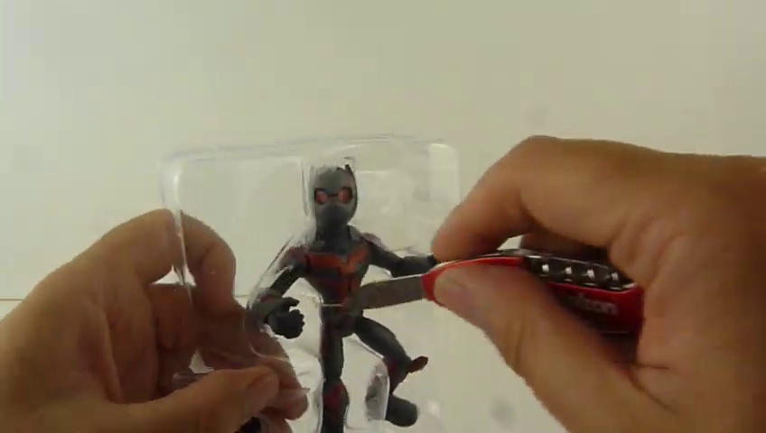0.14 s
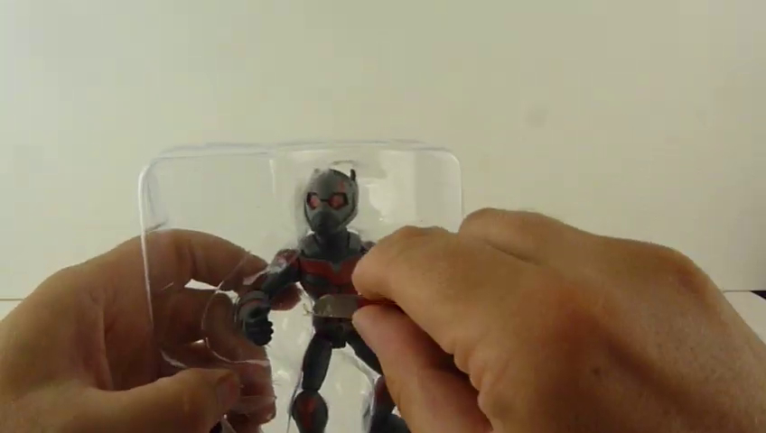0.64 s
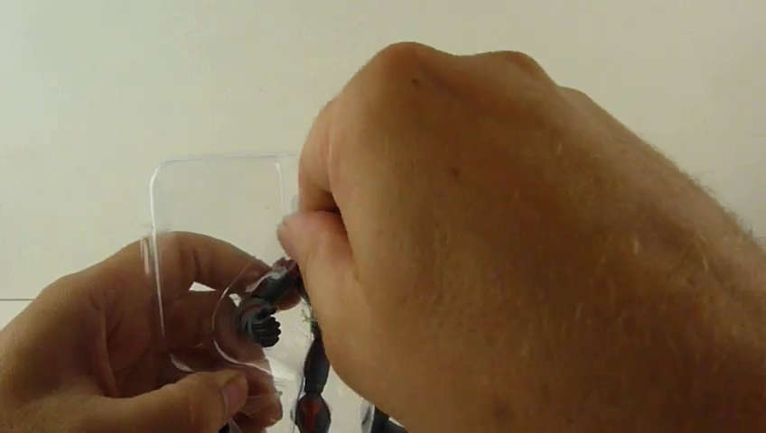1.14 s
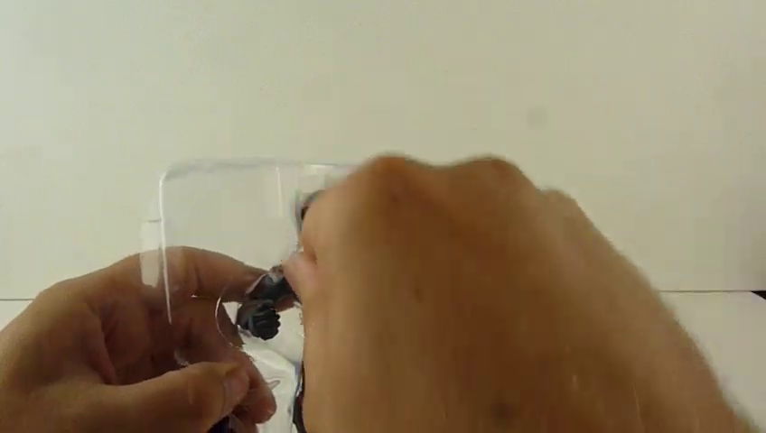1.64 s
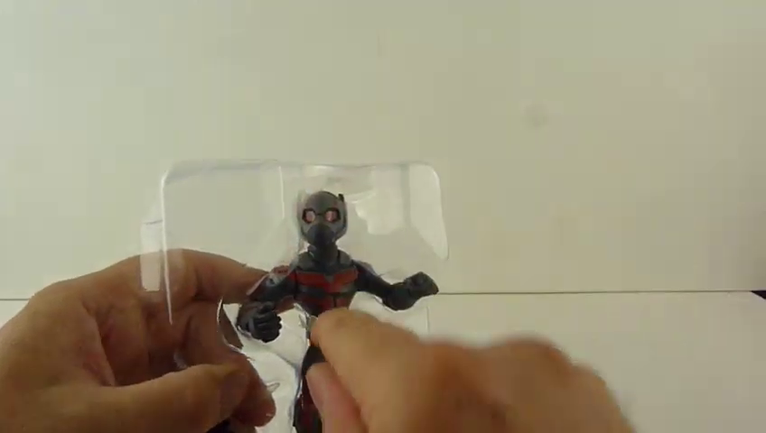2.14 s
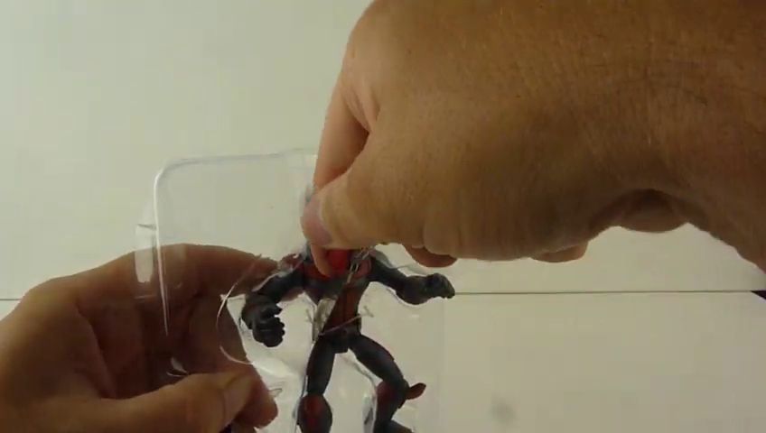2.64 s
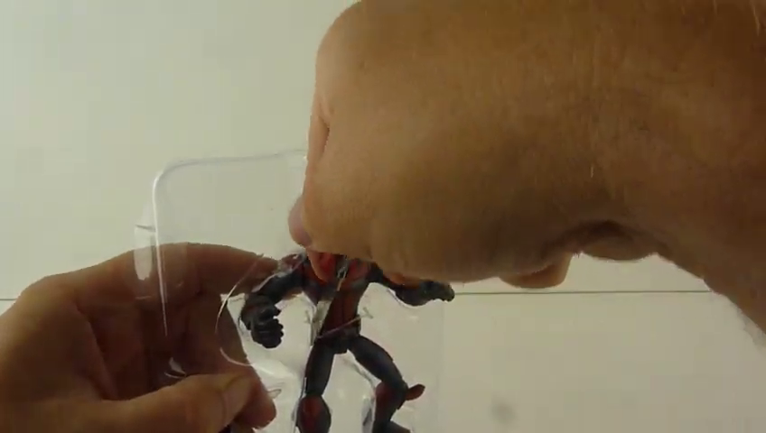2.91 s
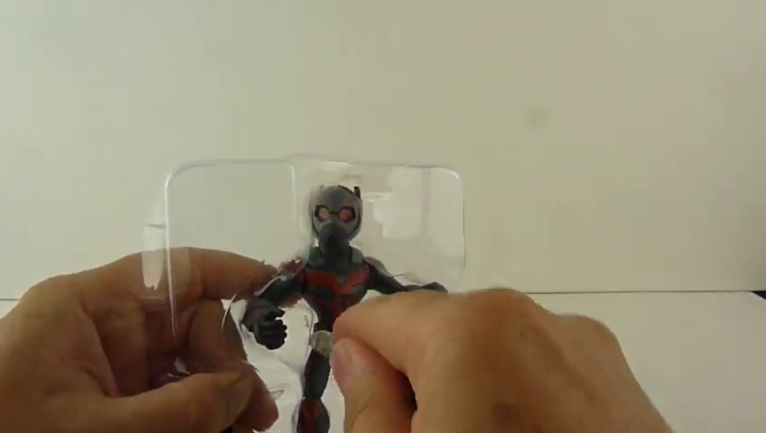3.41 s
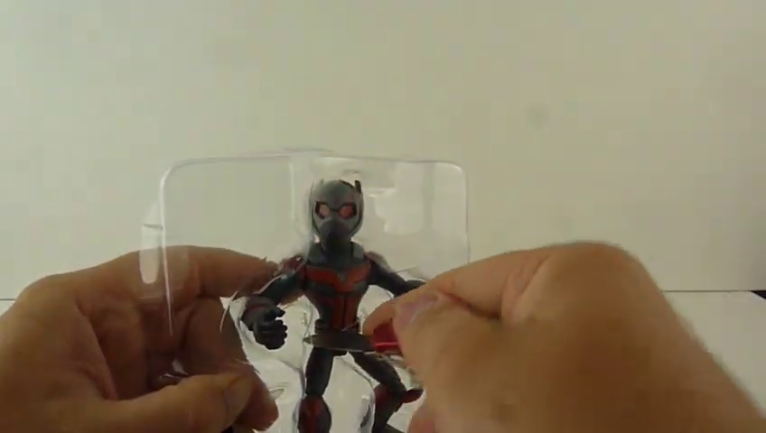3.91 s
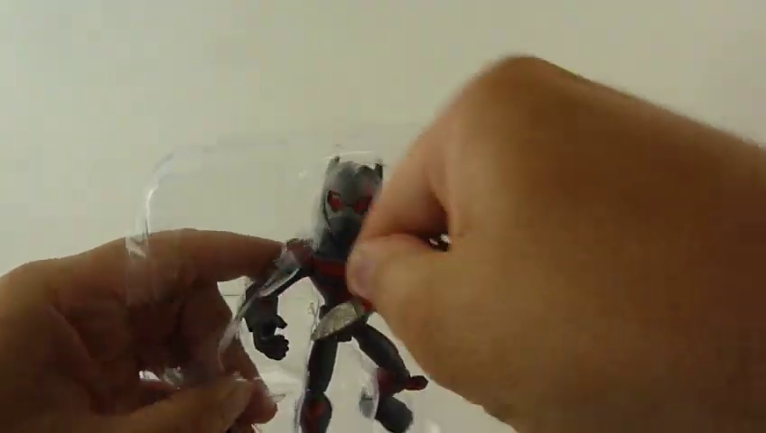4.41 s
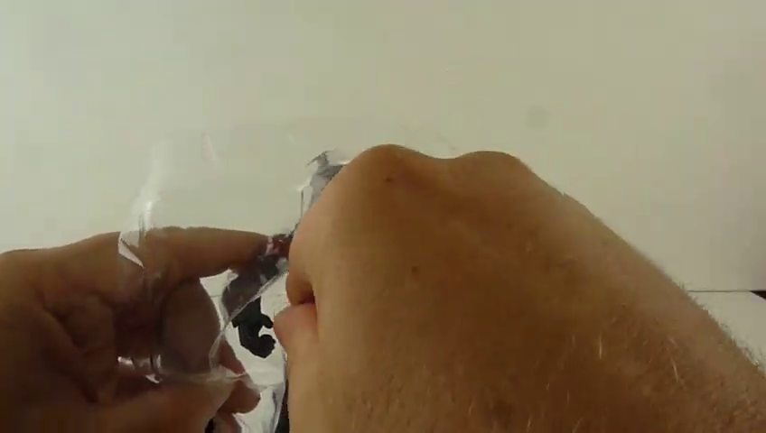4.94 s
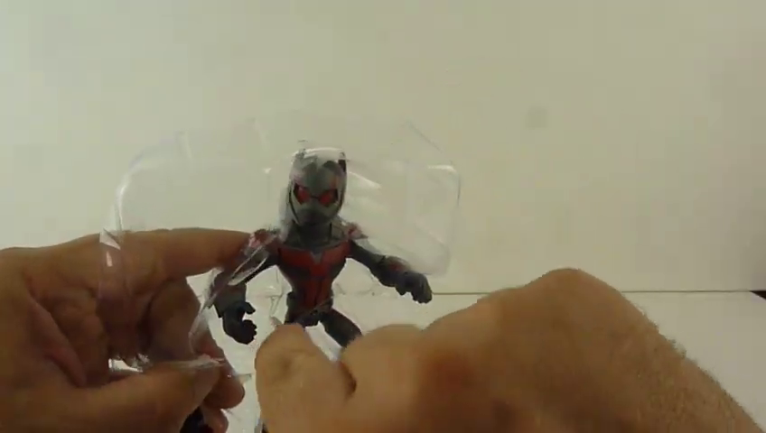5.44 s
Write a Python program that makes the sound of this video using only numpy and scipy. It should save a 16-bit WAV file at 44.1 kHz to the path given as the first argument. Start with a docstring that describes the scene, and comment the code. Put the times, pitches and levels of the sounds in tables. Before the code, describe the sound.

Hands flex stiff thin packaging while a blade knocks and briefly scrapes it. Dry clicks of varied pitch arrive in irregular clusters with fine crackle between, plus stronger snaps at about 2.5, 3.5, 4.25, 5.25 and 5.5 seconds. A close microphone with rolled-off highs catches a short small-room echo, faint rubbing hiss and very low background noise.

```python
"""In a quiet room, a thin moulded plastic tray is bent in one hand while a small knife picks at its ties, up close.
Each buckle or knife contact is a jolt with uneven after-slips, ringing the buckling spot and the tray's modes.
Small creases made the same way crackle at chance moments; the blade rasps as resonant friction noise.
Behind them lie the hiss of skin on plastic, a passing low hum (a gliding sine) and room air (coloured noise)."""
import sys
import numpy as np
from scipy import signal
from scipy.fft import rfft, irfft, next_fast_len
from scipy.io import wavfile
from scipy.ndimage import map_coordinates

SR = 44100
rng = np.random.default_rng(int(sys.argv[2]) if len(sys.argv) > 2 else 0)


def gain_from_db(level_db):
    """Convert decibel levels to linear amplitude factors (20 dB per decade)."""
    decades = np.asarray(level_db, float) / 20
    return 10 ** decades


def wrap_up_sound(samples):
    """Save the sound to the file named by the first command line argument, as 16-bit audio."""
    columns = np.atleast_2d(samples).T
    # keep every value between -1 and 1, then stretch to whole-number steps
    tamed = np.clip(columns, -1, 1)
    steps = np.round(tamed * 32767).astype(np.int16)
    wavfile.write(sys.argv[1], SR, steps)


N = 245122  # length in samples


def unit(x):
    """Scale to rms 1 along the last axis."""
    return x / np.sqrt(np.mean(x ** 2, axis=-1, keepdims=True) + 1e-20)


def along(points, hz):
    """Read (f/Hz, value) points on a log frequency axis."""
    f, value = np.transpose(points)
    return np.interp(np.log(hz + 1), np.log(f + 1), value)


def curves(rows):
    """One value per sample for each column after the time."""
    s, *columns = np.transpose(rows)
    return [np.interp(np.arange(N) / SR, s, column) for column in columns]


def filtered(x, response):
    """Multiply the spectrum of x by a function of frequency."""
    n = x.shape[-1]
    padded = next_fast_len(n + 8192)
    return irfft(rfft(x, padded) * response(np.fft.rfftfreq(padded, 1 / SR)), padded)[..., :n]


def hiss(spectrum):
    """Noise of rms 1 with the given colour."""
    return unit(filtered(rng.standard_normal(N), lambda hz: gain_from_db(along(spectrum, hz))))


def wobble(rate):
    """A smooth random curve, rate knots a second."""
    knots = rng.standard_normal(int(N * rate / SR) + 4)
    return map_coordinates(knots, [np.arange(N) * rate / SR])


def resonance(hz, centre, width):
    """Response of one damped mode, 1 at its centre; all in Hz."""
    return 1j * hz * width / (centre ** 2 - hz ** 2 + 1j * hz * width)


def laid(times, sounds, count=6):
    """Place the sounds in time, dealt out over several spots in the room."""
    spots = np.zeros((count, N + sounds.shape[1]))
    for k, (s, sound) in enumerate(zip(times, sounds)):
        spots[k % count, round(s * SR):][:len(sound)] += sound
    return spots[:, :N]


# buckles and knife contacts: (t/s, level/dB rms over the first 6 ms, favoured pitch f/Hz,
# fall below the pitch/dB per octave, fall above it/dB per octave)
BUCKLES = [(0.0226, -50, 2190, 0.5, 10), (0.0925, -48.5, 1510, 6, 12), (0.0991, -34.5, 3300, 2.5, 4.5),
           (0.133, -44, 500, 1.5, 8), (0.141, -33.5, 1750, 0, 6), (0.2166, -36.5, 2070, 11.5, 6.5),
           (0.2389, -40, 1280, 3.5, 7), (0.3118, -52.5, 2250, 3, 10.5), (0.5343, -36.5, 4150, -1.5, 14),
           (0.5555, -36.5, 1150, 1, 2), (0.6079, -37.5, 880, -1, 8), (0.6502, -53, 2290, 7, 16),
           (0.817, -53.5, 5900, 6, 8), (0.8494, -35.5, 2160, 5.5, 13), (0.8851, -34.5, 2190, 1.5, 11.5),
           (0.9041, -41, 1710, 11, 7.5), (1.04, -28.5, 478, 0, 9), (1.039, -25, 1500, 9, 8.5),
           (1.1052, -46, 1310, 4.5, 13.0), (1.1923, -50, 1010, 7, 10), (1.2439, -29.5, 2000, 0.5, 10.5),
           (1.3225, -47.5, 5870, 1, -2), (1.335, -37, 1730, -0.5, 5.5), (1.3812, -38, 1700, -0.5, 10),
           (1.4017, -42, 720, -4.5, 5), (1.4133, -41.5, 3300.0, -2, 1), (1.4244, -39, 1940, -3, 2.5),
           (1.4468, -43.5, 1920, 3, 0.5), (1.4496, -40, 537, 1, 11), (1.4943, -47, 880.0, -3, 6),
           (1.5226, -46.5, 860, -7.5, 10.0), (1.5544, -46.5, 870, -5.5, 10), (1.5668, -55, 740.0, 0, 8),
           (1.6006, -41, 2270, 1, 9.5), (1.6123, -42.5, 1250, 9, 11), (1.6227, -40.5, 1160, 5.5, 11),
           (1.641, -41, 630, 8, 16), (1.6723, -54, 876, -10, 21), (1.7792, -46.5, 850, -3, 8),
           (1.8588, -46.5, 1110, -8, 19), (1.8924, -47, 2930.0, 5.5, 16), (1.9077, -38, 1090, -3, 9.5),
           (1.988, -49, 2970, 1, 13), (2.0957, -52.5, 990, 12, 11), (2.1059, -34.5, 1640, -1.5, 8.5),
           (2.1062, -43.5, 432, 8.5, 18), (2.186, -48.5, 1680, 5, 26), (2.2003, -46.5, 1940, 4, 3),
           (2.2124, -38, 1750, 0.5, 5.5), (2.2728, -40, 1080, -4, 9), (2.2995, -36, 680, 0.5, 11),
           (2.3184, -32.5, 1790, 15, 11.5), (2.3295, -42, 1940, -5.5, 15), (2.4125, -29, 1810, 1, 14.5),
           (2.5136, -34.5, 1180, -4, 3), (2.521, -39.5, 1800, 2, 9.5), (2.5563, -18, 6300, 17, -2),
           (2.5544, -15, 2990, 10, 3), (2.5848, -41.5, 890, -0.5, 4), (2.6858, -32.5, 1700, 4, 7.5),
           (2.8253, -35.5, 1900, 4, 12), (2.8649, -39.5, 5630, 4, 4), (2.9003, -51, 537, 20, 21),
           (2.9281, -51, 1040, -7, 14), (2.9796, -42.5, 3100, 15, 18.5), (3.086, -46, 590, 0, 22),
           (3.171, -36.5, 615, 10, 12), (3.2081, -38, 1160, 10, 8), (3.275, -37.5, 1440, -5, 16),
           (3.3342, -30, 1120, 3, 5), (3.38, -38.5, 1140, -4.5, 10), (3.4342, -52, 1050.0, 18, 9),
           (3.4541, -43, 1190.0, -1, 11), (3.499, -39.5, 2150, -4.5, 6), (3.5104, -21, 950, 6, 6.5),
           (3.553, -39.5, 1830, -3.5, 10.0), (3.581, -39, 2150, -4, 9), (3.636, -43, 1180, 0, 12),
           (3.675, -40.5, 900, 1, 15.5), (3.7369, -45, 1110, -5, 15), (3.759, -42, 1590, -1.5, 2),
           (3.7847, -47, 610, 16, 6), (3.802, -50, 2400, 2, 8), (3.8484, -32.5, 960, -3.5, 7.5),
           (4.0259, -37, 1000, -0.5, 6), (4.1146, -32, 1940, 6, 10.5), (4.196, -45.5, 1690, -2, 7.5),
           (4.236, -26, 5030, -3, -20.5), (4.2417, -21.5, 1520, 8.5, 12.5), (4.2693, -26, 1170, 11.5, 9),
           (4.2708, -25.5, 2370, 13, 18.5), (4.2686, -21, 4410, 22, 23.5), (4.2762, -23, 4500.0, 1.5, -4),
           (4.2776, -24.5, 4450.0, -0.5, 11.5), (4.2899, -28, 1470, 13, 13), (4.336, -31, 3700, -1.5, 8),
           (4.3456, -33, 1080, 9.5, 11), (4.355, -37, 2580, 0, 7), (4.3612, -34.5, 3300.0, 2, 9.5),
           (4.3685, -32, 1720, 2, 5.5), (4.3999, -32.5, 1630, -3, 14), (4.456, -36, 1190, 12, 6.5),
           (4.476, -35.5, 2220, 2.5, 14.5), (4.483, -36.5, 1810.0, 2, 3.0),
           (4.4961, -34.5, 1720, 5.5, 10.5), (4.5042, -37, 1120, -0.5, 5), (4.6168, -49, 1276, -2.5, 26),
           (4.712, -32.5, 2276, -1, 7), (4.91, -37.0, 1195, 7.5, 7), (4.9852, -40.5, 2310, 0, 15),
           (5.0815, -49, 2270, 1.5, 14), (5.1166, -49, 1880, 5, 8.5), (5.1603, -43, 2250, 5, 22),
           (5.226, -38, 2190, 3, 14.5), (5.2531, -21, 4490, 17, 0.5), (5.2549, -31, 1540, 9, 14.5),
           (5.2547, -10, 6000, 13, 2), (5.3045, -41, 600, 19, 4.5), (5.3861, -30, 564, 10, 3.5),
           (5.4295, -42, 2730, 7, 16), (5.4471, -49.5, 2300.0, -8, 26), (5.487, -42.5, 1370, 5, 14),
           (5.5127, -43, 1660, 2.5, 16.5), (5.5505, -23.5, 1270, 0, 7)]


def snaps():
    """The clear buckles and knife contacts, each jolting the sheet at its set moment."""
    s, *sound = np.transpose(BUCKLES)[:, :, None]
    return laid(s.ravel(), buckle(*sound))


def buckle(db, pitch_hz, below, above):
    """One sound per row: a jolt and its after-slips ring the buckling spot and the tray's modes."""
    size = 2048
    hz = np.fft.rfftfreq(2 * size, 1 / SR) + 1
    force = rfft(jolt(len(db), size), 2 * size)
    response = spot(hz, pitch_hz, below, above) * tray_modes(hz, len(db))
    out = irfft(force * response)[:, :size]
    onset = out[:, :round(.006 * SR)]
    return gain_from_db(db) * out / np.sqrt(np.mean(onset ** 2, axis=1, keepdims=True))


def jolt(count, size):
    """A unit impulse, then dying noise: slips of uneven strength that crowd just after the jolt."""
    shiver_db, shiver_t60_s = -19.5, 0.047  # after-slips against the first jolt
    tear_db, tear_t60_s = 3.5, 0.011  # early crowding against the after-slips
    t = np.arange(size) / SR
    slips = gain_from_db(2 * np.repeat(rng.standard_normal((count, size // 64)), 64, axis=1))
    force = gain_from_db(shiver_db - 60 * t / shiver_t60_s) * slips * rng.standard_normal((count, size))
    force *= 1 + gain_from_db(tear_db - 60 * t / tear_t60_s)
    force[:, 0] = 1
    return force


def spot(hz, pitch_hz, below, above):
    """The buckling spot favours its own pitch; a small sheet radiates little bass."""
    lift_db, lift_width = 4.5, 0.11  # fullest lift at the pitch, its width in log frequency
    lift_top_hz = 1950  # brighter snaps favour their pitch less
    bass_hz = 500
    # the slope above the pitch stays level beyond 8 kHz
    octaves = np.log2(np.minimum(hz, 8000) / pitch_hz)
    colour_db = below * np.clip(octaves, -3, 0) - above * np.maximum(octaves, 0)
    colour_db = colour_db - 10.05 * np.maximum(np.log2(bass_hz / hz), 0)
    lift_db = lift_db * np.minimum(lift_top_hz / pitch_hz, 1) ** 2
    colour_db = colour_db + lift_db * np.exp(-(np.log(hz / pitch_hz) / lift_width) ** 2)
    # a one-sided cepstrum makes the response causal: nothing sounds before the jolt
    cepstrum = irfft(np.log(gain_from_db(colour_db) + 1e-5))
    size = len(hz) - 1
    cepstrum[:, 1:size] *= 2
    cepstrum[:, size + 1:] = 0
    return np.exp(rfft(cepstrum))


# nominal modes of the tray: f/Hz
TRAY_MODES = [440, 520, 590, 770, 880, 980, 1150, 1300, 1530, 1740, 1880, 2020, 2370, 2690, 2920, 3180,
              3450, 4100, 4600, 5800, 6200, 6700, 7300]


def tray_modes(hz, count):
    """The plain click plus modes that bending retunes a little; higher ones lose energy faster."""
    t60_s, mode_db = 0.043, -8.5  # ring time at 1 kHz; middle level of a mode over the plain click
    tune, weight = rng.standard_normal((2, len(TRAY_MODES), count, 1))
    tray = np.ones((count, len(hz)), complex)
    for mode_hz, shift, size_db in zip(TRAY_MODES, tune, 2.5 * weight):
        centre = mode_hz * (1 + .015 * shift)
        width = np.log(1000) / np.pi / t60_s * (mode_hz / 1000) ** .4
        tray += gain_from_db(mode_db + size_db) * resonance(hz, centre, width)
    return tray


# how hard the hands press and how fast the skin slides: (t/s, crease base level/dB, rub middle level/dB)
HANDS = [(0, -66, -65), (.23, -56.5, -63.5), (.45, -64.5, -63.5), (.75, -82, -67), (1.04, -54.5, -64),
         (1.45, -56, -68), (1.72, -68.5, -67), (2.35, -53.5, -64), (3.03, -68.5, -66), (3.41, -53.5, -69),
         (3.7, -62, -66.5), (3.9, -70, -68.5), (4.1, -58, -68), (4.36, -41.5, -67), (4.65, -68, -67.5),
         (4.95, -65.5, -66.5), (5.5, -57.5, -64.5)]


def creases(count=330):
    """Small dull buckles crackle at chance moments, louder as the hands press harder."""
    when, size, pitch, below, above = rng.random((5, count, 1))
    times = when * (N - 1) / SR
    press_db = curves(HANDS)[0][(times * SR).astype(int)]
    size_db = press_db - 3 * np.log(size + 0.064) - 2.5  # mostly small, a few large
    sounds = buckle(size_db, 450 * 3.37 ** pitch, 6 * below, 7 + 8 * above)
    return laid(times.ravel(), sounds)


# short drags of the blade: (t/s, level/dB rms)
BLADE_DRAGS = [(1.355, -53), (1.791, -49), (2.02, -51.5), (2.234, -49.5), (2.652, -54.5), (2.753, -53),
               (2.995, -50), (3.176, -48)]
# resonances a rasp rings with: (f/Hz, width/Hz, relative level/dB)
BLADE_MODES = [(1020, 180, -0.5), (2670, 48, 6.5), (3100, 190, 2.5), (4860, 520, -11.5)]


def rasps():
    """The blade drags for a moment: a burst of friction noise through its fixed resonances."""
    s, db = np.transpose(BLADE_DRAGS)
    t = np.arange(1024) / SR
    drag = rng.standard_normal((len(s), len(t))) * np.exp(-(t / 0.025) ** 2)

    def body(hz):
        # neighbouring modes answer in opposite phase
        return sum((-1) ** k * gain_from_db(level) * resonance(hz, centre, width)
                   for k, (centre, width, level) in enumerate(BLADE_MODES))

    return laid(s, gain_from_db(db)[:, None] * unit(filtered(drag, body)))


# colour of skin on the sheet: (f/Hz, relative level/dB per Hz)
SKIN_COLOUR = [(1200, -24), (2500, -6.5), (7500, -10.5)]


def rub():
    """Skin sliding on the sheet: a faint hiss of randomly wavering level."""
    return gain_from_db(curves(HANDS)[1] + 3.8 * wobble(39)) * hiss(SKIN_COLOUR)


# echo decay: (f/Hz, t60/s)
ECHO_DECAY = [(400, 0.24), (8000, 0.19)]


def room(spots):
    """Each spot has its own noise tail, every frequency dying at its own speed."""
    noise = rng.standard_normal((len(spots), SR // 3))
    hz, t, z = signal.stft(noise, SR, nperseg=256)
    decay = gain_from_db(-60 * t / along(ECHO_DECAY, hz)[:, None])
    tail = signal.istft(z * decay, SR, nperseg=256)[1]
    tail = tail / np.linalg.norm(tail, axis=1, keepdims=True)
    tail = np.pad(tail, ((0, 0), (round(0.0035 * SR), 0)))  # delay before the echo, in s
    return signal.fftconvolve(spots, tail, axes=1)[:, :N].sum(axis=0)


# the passing hum: (t/s, f/Hz, level/dB rms)
HUM_PATH = [(.36, 64.2, -78), (.58, 66.8, -71), (1, 67.6, -73), (1.2, 61, -88)]


def hum():
    """A low sine that swells and fades while its pitch glides."""
    hz, db = curves(HUM_PATH)
    t = np.arange(N) / SR
    on = (t > HUM_PATH[0][0]) & (t < HUM_PATH[-1][0])
    return on * np.sqrt(2) * gain_from_db(db) * np.sin(2 * np.pi * np.cumsum(hz) / SR)


# colour of the room air: (f/Hz, relative level/dB per Hz)
AIR_COLOUR = [(25, -9), (60, 0), (600, 0), (1500, -6), (4000, -15.5), (9000, -29.5)]


def air():
    """Room air: steady noise, weakest in the treble."""
    return gain_from_db(-65.5) * hiss(AIR_COLOUR)


def scene():
    """The tray and blade, their echo, the rubbing skin, the hum and the air of the room."""
    tray = snaps() + creases() + rasps()
    echo = gain_from_db(-9.5) * room(tray)
    return (tray.sum(axis=0) + echo + rub() + hum() + air())[None]


# treble roll-off: (f/Hz, level/dB)
MIC_RESPONSE = [(7200, 0.5), (8000, -7.5), (8600, -17.5), (9500, -83)]
# narrow dips in the treble: (f/Hz, width/Hz)
MIC_DIPS = [(5380, 330), (7700, 160), (8290, 130)]


def microphone(dry):
    """The microphone rolls off in the treble and has a few narrow notches."""
    def response(hz):
        dips = [(hz * hz - c * c) / (hz * hz - c * c - 1j * hz * w) for c, w in MIC_DIPS]
        return gain_from_db(along(MIC_RESPONSE, hz)) * np.prod(dips, axis=0)

    return filtered(dry, response)


def roll_off(x):
    """The treble ends steeply here."""
    return signal.sosfilt(signal.butter(12, 8940, fs=SR, output="sos"), x)


def record(dry):
    """The scene as picked up by the microphone."""
    mix = microphone(dry)
    return roll_off(mix)


dry = scene()
out = record(dry)
wrap_up_sound(out)
```